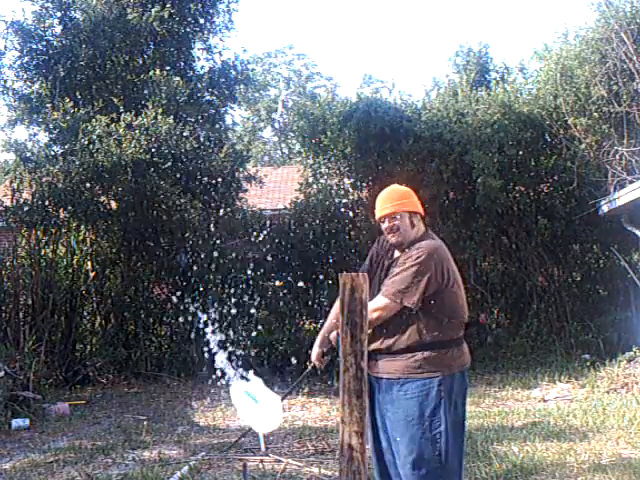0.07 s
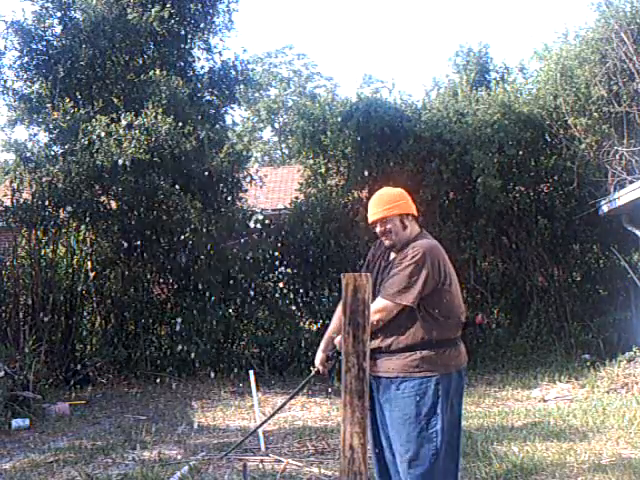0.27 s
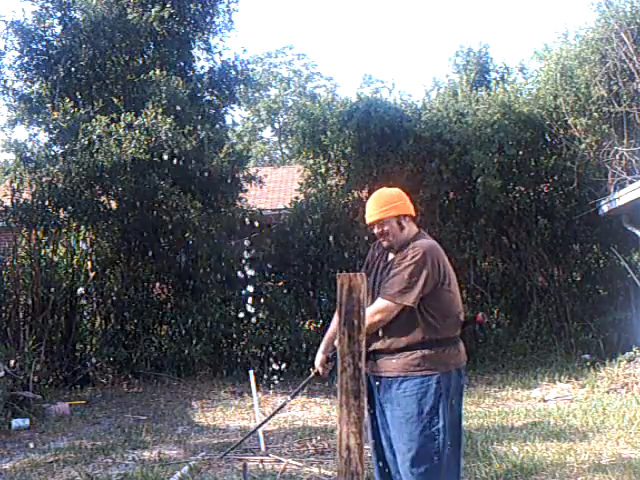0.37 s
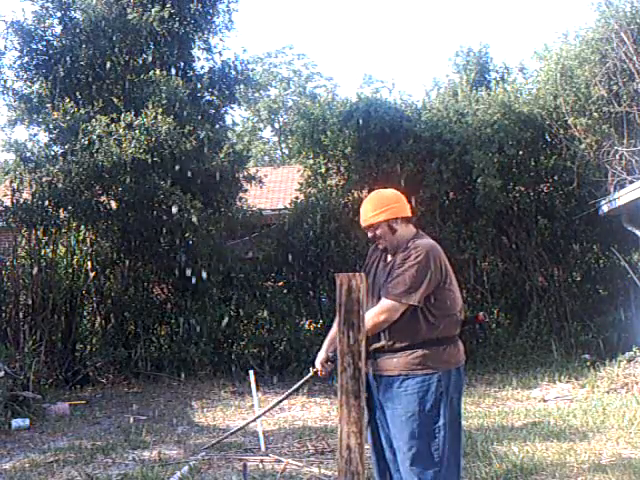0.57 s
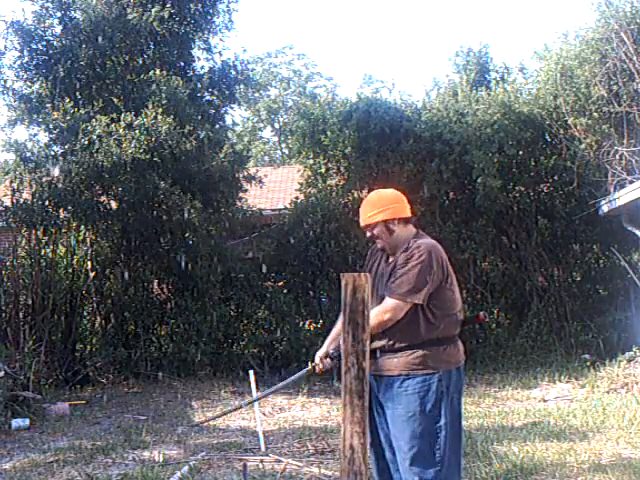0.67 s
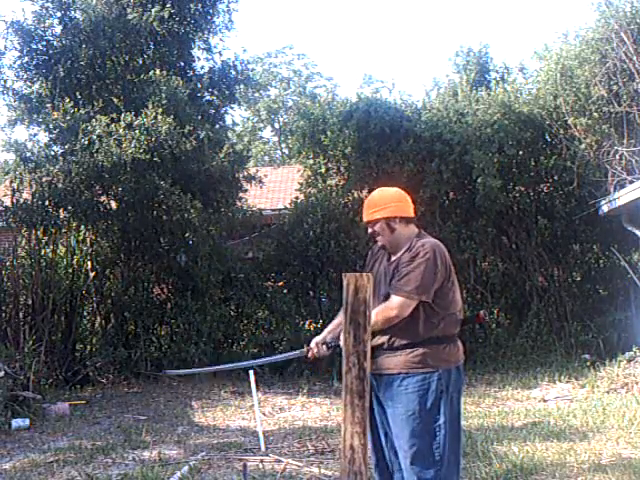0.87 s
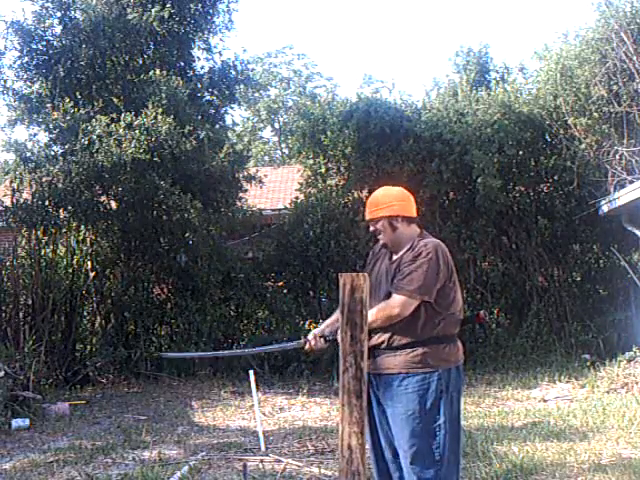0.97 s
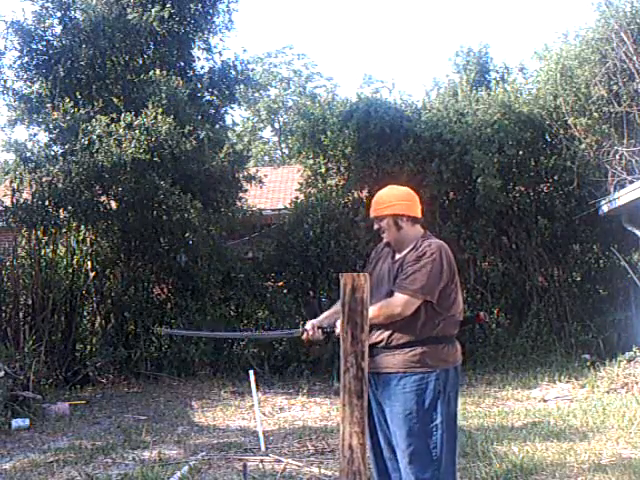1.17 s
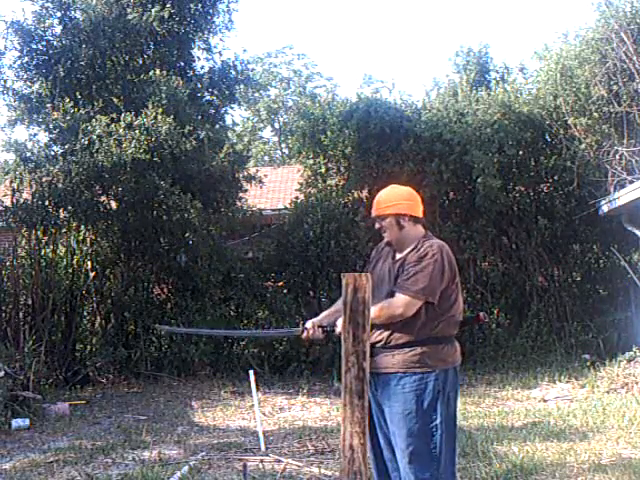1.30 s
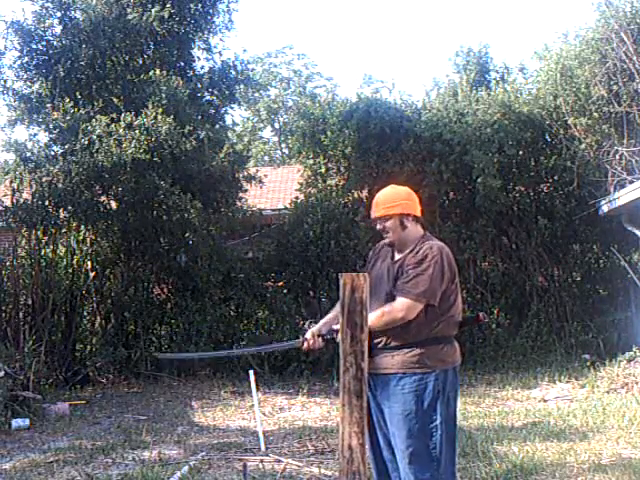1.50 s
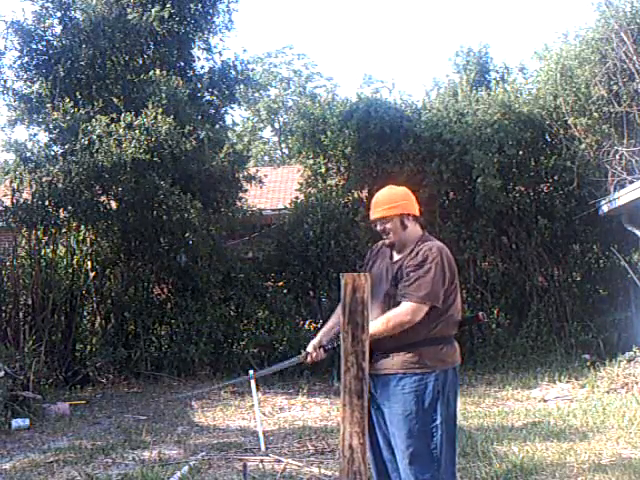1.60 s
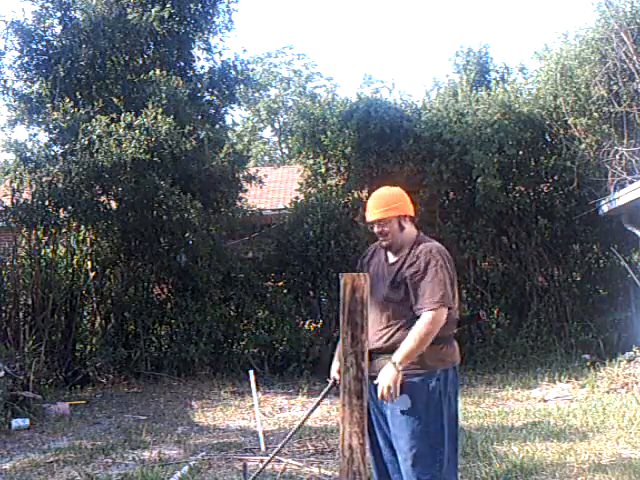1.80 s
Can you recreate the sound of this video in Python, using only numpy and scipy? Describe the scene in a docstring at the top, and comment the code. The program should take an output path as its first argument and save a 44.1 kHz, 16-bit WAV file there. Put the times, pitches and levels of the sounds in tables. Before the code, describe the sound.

A blade rips through a plastic jug of water in a backyard, followed by a loud crunching landing, splattering water and a hollow bounce. Birds chirp faintly far off, and the slightly overloaded microphone has little treble.

```python
"""A back yard, with small birds chirping far off. A sword rips through a water-filled plastic jug and
sets its wall ringing; fence and trees reflect the crack. The jug hits the ground, buckles and bounces,
each impact exciting damped modes, while water patters down and trapped air pockets resonate.
A narrow-band microphone saturates on the two big blows."""
import sys
import numpy as np
from scipy import signal
from scipy.fft import rfft, irfft, next_fast_len
from scipy.io import wavfile

SR = 44100
rng = np.random.default_rng(int(sys.argv[2]) if len(sys.argv) > 2 else 0)


def master(y):
    """Save y as 16-bit WAV."""
    cut = np.clip(np.atleast_2d(y).T, -1, 1)
    pcm = np.round(cut * 32767)  # scale
    wavfile.write(sys.argv[1], SR, pcm.astype(np.int16))


N = 81585
T = np.arange(N) / SR
BAND_HZ = 5405  # upper end of the microphone's band


def undb(db):
    """Level in decibels to amplitude ratio."""
    return 10 ** (np.asarray(db) / 20)


def unit(x):
    """Normalisation to rms 1."""
    return x / np.sqrt(np.mean(x ** 2))


def colour(x, points):
    """Minimum-phase filter through (Hz, dB) points, of unit mean power gain below BAND_HZ."""
    hz, db = np.array(points, float).T
    size = 2 * next_fast_len(N)
    f = np.arange(size // 2 + 1) * SR / size
    gain = undb(np.interp(np.log(f + 1), np.log(hz), db))
    gain /= np.sqrt(np.mean(gain[f < BAND_HZ] ** 2))
    cepstrum = irfft(np.log(gain))
    cepstrum[1:size // 2] *= 2  # folding the cepstrum makes the filter causal
    cepstrum[size // 2 + 1:] = 0
    return irfft(rfft(x, size) * np.exp(rfft(cepstrum)))[:N]


def band(x, lo_hz, hi_hz):
    """Band-pass filtering, normalised to rms 1."""
    return unit(signal.sosfilt(signal.butter(3, [lo_hz, hi_hz], "band", fs=SR, output="sos"), x))


def grit(centre_hz=None, octaves=1):
    """Envelope compression turns band-limited noise, flat or humped, into a dense, even crackle."""
    f = np.arange(N // 2 + 1) * SR / N + 1
    hump = 1
    if centre_hz is not None:
        hump = np.exp(-.5 * (np.log2(f / centre_hz) / octaves) ** 2) * (centre_hz / f) ** .25
    noise = irfft(rfft(rng.standard_normal(N)) * hump * (f < BAND_HZ * 1.1), N)
    analytic = signal.hilbert(noise, next_fast_len(N))[:N]
    return unit(analytic.real / np.sqrt(np.abs(analytic)))


def burst(start, fall, hold=0, attack=0.00051):
    """Envelope with a linear attack and, after the hold, exponential decay of time constant fall."""
    age = T - start
    return np.clip(age / attack, 0, 1) * np.exp(-np.maximum(age - hold, 0) / fall)


def ring(start, modes, pitch=1, length=1):
    """Modal superposition: a struck body vibrates as a sum of damped sinusoids."""
    age = np.maximum(T - start, 0)
    return sum((-1) ** k * undb(db - 60 * age / (t60 * length)) * np.sin(2 * np.pi * hz * pitch * age)
               for k, (hz, db, t60) in enumerate(modes))


def pulse(start, hz, damping):
    """Transient of a heavily damped oscillator, differentiated and scaled to peak 1."""
    phase = 2 * np.pi * hz * np.maximum(T - start, 0)
    swing = np.exp(-damping * phase) * np.sin(phase) * (1 - np.exp(-2 * phase))
    pressure = np.diff(swing, prepend=0)
    return pressure / np.abs(pressure).max()


def note(start, length, hz):
    """A gliding tone that swells and dies; its phase is the integral of its frequency."""
    progress = np.clip((T - start) / length, 0, 1)
    phase = 2 * np.pi * np.cumsum(hz * (progress > 0)) / SR
    return np.sqrt(2 * np.abs(np.sin(np.pi * progress))) * np.sin(phase)


def scatter(x, envelope):
    """Diffuse reflection from many small surfaces: convolution with enveloped noise of unit energy."""
    response = rng.standard_normal(N) * envelope
    return signal.fftconvolve(x, response / np.sqrt(np.sum(response ** 2)))[:N]


# spectrum of the outdoor air (frequency [Hz], relative level [dB])
AIR_SPECTRUM = [(25, -9), (55, 0), (120, -1), (160, -2), (250, -2.5), (400, -7.5), (560, -4.5), (800, -5),
                (2500, -7), (4900, -10), (5500, -13.5), (6500, -21)]
# bands of a low hum (centre frequency [Hz], level [dB])
HUM_BANDS = [(58, -60), (118, -59)]
def background():
    """Ambient noise: broadband air, and a hum that wavers as narrow-band noise does."""
    hum = sum(undb(db) * band(rng.standard_normal(N), hz - 4, hz + 4) for hz, db in HUM_BANDS)
    air = colour(band(rng.standard_normal(N), 8.1, 11000), AIR_SPECTRUM)
    return undb(-47) * unit(air) + hum


# bird chirps (time [s], duration [s], turning point [fraction of duration],
# start frequency [Hz], turning frequency [Hz], end frequency [Hz], level [dB])
BIRD_CHIRPS = [(.008, .026, .3, 3450, 3350, 3650, -44), (.036, .022, .4, 3080, 3080, 3280, -47),
               (.536, .033, .3, 3170, 3180, 3620, -41.5), (.582, .027, .7, 2500, 2920, 3300, -42),
               (.616, .023, .28, 3400, 2520, 3100, -44), (.646, .028, .3, 2600, 2330, 3300, -50),
               (.735, .04, .4, 2750, 2280, 1900, -49), (1.63, .04, .5, 2850, 2830, 2780, -52)]
def birds():
    """Frequency modulation: each short whistle glides through three pitches."""
    song = 0
    for start, length, turn, first_hz, turn_hz, last_hz, db in BIRD_CHIRPS:
        hz = np.interp((T - start) / length, [0, turn, 1], [first_hz, turn_hz, last_hz])
        song = song + undb(db) * note(start, length, hz)
    return song


CUT_S = .1998
# spectrum of the dragging blade (frequency [Hz], relative level [dB])
DRAG_SPECTRUM = [(30, -8.5), (100, -15), (250, -14), (536, -1.5), (844, -1), (1150, 1.5), (1440, 2),
                 (1740, -11), (2000, -7), (2960, -7), (4120, -11.5), (5300, -11), (6500, -15.5)]
# jerks in which the wall gives way (time [s], level [dB])
WALL_RIPS = [(.1999, -1), (.2072, 3), (.2101, -1), (.2144, -8), (.2166, 1), (.2212, -11)]
def blade():
    """Friction and fracture: the blade drags through the wall, which tears in quick jerks."""
    drag = unit(colour(grit(), DRAG_SPECTRUM)) * burst(CUT_S, fall=.009, hold=.0135)
    jerks = sum(undb(db) * burst(start, fall=.0011) for start, db in WALL_RIPS)
    return undb(-6.5) * drag + grit(centre_hz=3950, octaves=1.22) * jerks


# modes of the full jug (frequency [Hz], relative level [dB])
FULL_JUG_MODES = [(430, -13), (848, 0), (1021, -5), (1115, 2), (1273, 1), (1410, -4), (1982, -8),
                  (2384, -11), (2588, -9), (2863, -4), (3028, -6), (3403, -8), (3825, -7), (4169, -6),
                  (4505, -10), (4977, -9), (5160, -10)]
def jug_wall():
    """Forced vibration: the full jug rings while the blade drags, then dies away."""
    modes = sum(undb(db) * np.sin(2 * np.pi * (hz * T + rng.random())) for hz, db in FULL_JUG_MODES)
    return undb(-8.5) * modes * burst(CUT_S, fall=.0086, hold=.0096, attack=.0018)


# spectrum of water spraying from the cut (frequency [Hz], relative level [dB])
SPRAY_SPECTRUM = [(60, -17.5), (118, 6), (170, -13), (300, -10), (480, -2), (700, 3), (1120, 10), (1500, 3),
                  (3000, 5), (5300, -1.5)]
def gush(t60_s=1):
    """Displacement: the blow pushes a puff of air and a dying spray out of the opened jug."""
    puff = pulse(CUT_S, hz=115, damping=.84)
    outflow = burst(CUT_S + .01, fall=t60_s / np.log(1000), hold=.011, attack=.033)
    spray = unit(colour(grit(), SPRAY_SPECTRUM)) * outflow
    return undb(-12) * puff + undb(-29.5) * spray


YARD_T60_S = .56
YARD_TAIL = burst(.005, fall=YARD_T60_S / np.log(1000), attack=.0084)
# frequency response of the yard's reverberation (frequency [Hz], relative gain [dB])
YARD_RESPONSE = [(80, -8.5), (300, -12), (700, -2), (1120, -6), (1450, 1.5), (1900, -3.5), (3000, -1.5),
                 (5000, 4)]
def reverberation(x):
    """Multiple scattering in the yard leaves an exponentially decaying tail."""
    return undb(-23.5) * colour(scatter(x, YARD_TAIL), YARD_RESPONSE)


# reflections from fence and trees (delay [s], gain [dB], decay time constant [s])
REFLECTIONS = [(.05, -22, .025), (0.107, -26.5, .004), (0.187, -29, 0.0063), (0.213, -32, 0.0083),
               (.255, -31, .006)]
# frequency response of those reflections (frequency [Hz], relative gain [dB])
REFLECTION_RESPONSE = [(100, -6), (600, -6), (950, -1.5), (1140, 7), (1400, -4), (1650, -10.5), (1850, 5),
                       (2300, 2.5), (3000, 1), (5000, -1)]
def echoes(x):
    """Reflection: fence and trees return separate echoes, each delayed and smeared in time."""
    returns = sum(undb(db) * scatter(x, burst(delay, fall)) for delay, db, fall in REFLECTIONS)
    return colour(returns, REFLECTION_RESPONSE)


# slaps and crackles of the plastic
# (time [s], level [dB], centre frequency [Hz], width [octaves], decay time constant [s])
PLASTIC_CRACKS = [(.86, -17, 900, 2, .01), (.863, -16, 1520, 1.7, 0.031), (0.877, -15.5, 703, 1.6, 0.0062),
                  (0.8863, 0, 4000, 2.4, 0.0017), (0.887, -6.5, 1590, 3.7, .011),
                  (.904, -11.5, 1190, 1.7, 0.0066), (.923, -15, 1480, 1.3, 0.0039),
                  (.928, -14, 1265, 0.38, 0.0031), (.94, -20, 880, 1.2, 0.0051),
                  (0.947, -24.5, 1886, 1.3, 0.0096), (0.959, -22.5, 2390, 3, 0.011),
                  (.968, -25, 2210, 1.2, 0.0075), (1.02, -31.5, 500, 1.2, 0.02),
                  (1.216, -27, 1700, 3.2, 0.005), (1.2462, -13.5, 4510, 1.35, 0.0043),
                  (1.261, -29, 4200, 0.75, .0062), (1.2667, -13.5, 2380, 2, 0.0047),
                  (1.2814, -20.5, 3020, 1.3, 0.0027), (1.2877, -22.5, 1600, 0.86, 0.0022),
                  (1.405, -29.5, 1014, 1.3, 0.02), (1.441, -25.5, 1550, 1.3, 0.016),
                  (1.4802, -29.5, 3500, 0.67, 0.0046), (1.553, -35, 990, 0.87, 0.037),
                  (1.596, -24, 1210, 6.5, 0.0031), (1.597, -36.5, 243, 0.26, 0.015)]
def cracks():
    """Impact noise: slapping, crackling plastic gives off brief bands of noise."""
    return sum(undb(db) * grit(hz, octaves) * burst(start, fall)
               for start, db, hz, octaves, fall in PLASTIC_CRACKS)


# snaps of the plastic (time [s], peak level [dB], frequency [Hz], damping ratio [1])
BUCKLING_SNAPS = [(.8665, -1, 1500, .12), (.8862, 5, 2000, .25), (.895, -14, 130, .4), (.958, -9, 1800, .2),
                  (1.0212, -13, 3800, .2), (1.1075, -16, 1800, .1), (1.168, -22, 4600, .15),
                  (1.2083, -14, 2600, .3), (1.2203, -17, 900, .4), (1.2335, -5, 1700, .2),
                  (1.2492, -10, 4900, .07), (1.2595, -11, 4300, .1), (1.2686, -6.5, 1300, .25),
                  (1.2685, -15, 190, 1), (1.2885, -18, 1700, .15), (1.3652, -16.5, 3900, .12),
                  (1.4055, -20, 1300, .15), (1.4405, -11, 1300, .2), (1.4402, -17, 450, .2),
                  (1.5945, -18, 1000, .2)]
def snaps():
    """Buckling: the wall jumps to a new shape and radiates one sharp transient each time."""
    return sum(undb(db) * pulse(start, hz, damping) for start, db, hz, damping in BUCKLING_SNAPS)


# modes of the cut jug (frequency [Hz], relative level [dB], 60 dB decay time [s])
CUT_JUG_MODES = [(185, -15, .11), (262, -20, .1), (381, -20, .09), (490, -3.5, .105), (685, -.5, .095),
                 (830, -10, .1), (968, -11, .1), (1223, -11, .09), (1425, -12, .1), (1553, -12, .08),
                 (1850, -16, .09), (2102, -16, .08)]
# impacts on the ground (time [s], level [dB], frequency factor [1], decay time factor [1])
GROUND_IMPACTS = [(.8865, -11, 1.2, .6), (.8925, -2, 1, .62), (1.594, -38, 1, 1)]
def thumps():
    """Impulse excitation: each impact on the ground sets the cut jug's modes ringing."""
    return sum(undb(db) * ring(start, CUT_JUG_MODES, pitch, length)
               for start, db, pitch, length in GROUND_IMPACTS)


def drops(per_s=1800, spread_db=3):
    """A Poisson process of drop impacts, mostly small and a few large."""
    sizes = undb(spread_db * np.minimum(rng.exponential(size=N), 4))
    return (rng.random(N) < per_s / SR) * sizes * rng.choice([-1, 1], N)


# water running out onto the ground (time [s], slosh level [dB], splatter level [dB], spray level [dB])
WATER_LEVELS = [(.93, -37, -36.5, -29.5), (.975, -53, -40.5, -32.5), (1.05, -41.5, -39.5, -40),
                (1.115, -51.5, -37, -37), (1.159, -42.5, -47, -43), (1.205, -50.5, -38.5, -45.5),
                (1.266, -65, -32.5, -31.5), (1.34, -37.5, -39.5, -40.5), (1.39, -48.5, -38.5, -41.5),
                (1.472, -39.5, -42.5, -48), (1.496, -42, -34.5, -31.5), (1.539, -53, -38, -42.5),
                (1.611, -46.5, -41, -43), (1.64, -51, -65, -54), (1.85, -87, -66, -90)]
def water():
    """Shot noise: showers of drops merge into low slosh, middle splatter and high spray."""
    times, slosh_db, splatter_db, spray_db = np.array(WATER_LEVELS).T
    shower = drops()
    slosh = band(drops(), 260, 628) * undb(np.interp(T, times, slosh_db))
    splatter = band(shower, 520, 1870) * undb(np.interp(T, times, splatter_db))
    spray = band(shower + drops(), 2200, 5280) * undb(np.interp(T, times, spray_db))
    onset = np.clip((T - .89) / .017, 0, 1)
    return onset * (slosh + splatter + spray)


# air pockets gulping as the water shifts (time [s], duration [s], start frequency [Hz], level [dB])
AIR_POCKETS = [(.902, 0.013, 857, -11.5), (1.512, 0.015, 700, -37.5), (1.558, 0.019, 795, -34.5),
               (1.62, 0.053, 379, -49.5)]
def gulps(rise=.053):
    """Bubble resonance: trapped air rings briefly, rising in pitch as the pocket shrinks."""
    return sum(undb(db) * note(start, length, hz * (1 + rise * (T - start) / length))
               for start, length, hz, db in AIR_POCKETS)


# modes of the emptied jug (frequency [Hz], relative level [dB], 60 dB decay time [s])
EMPTY_JUG_MODES = [(375, -4, .055), (458, -2, .24), (587, -4, .07), (680, -2, .05), (1050, -3, .05),
                   (1200, -3, .05), (1380, -4, .045), (1990, -5, .045)]
# bounces of the emptied jug (time [s], level [dB], frequency factor [1])
BOUNCES = [(1.405, -39, 1.08), (1.4397, -20.5, 1.017), (1.617, -57, .87)]
def knocks():
    """Free vibration: the emptied jug rings hollow after each bounce."""
    return sum(undb(db) * ring(start, EMPTY_JUG_MODES, pitch) for start, db, pitch in BOUNCES)


def radiate(x, cutoff_hz=167):
    """Radiation efficiency: thin plastic gives off little sound below the cutoff."""
    return signal.sosfilt(signal.butter(2, cutoff_hz, "high", fs=SR, output="sos"), x)


def scene():
    """Superposition of direct and reflected sound; only the cut returns as separate echoes."""
    tear, wall, song = blade(), jug_wall(), birds()
    tumble = radiate(cracks() + thumps() + knocks()) + snaps() + gulps()
    outgoing_cut = tear + undb(-6) * wall
    reflected = reverberation(outgoing_cut + undb(2) * tumble) + echoes(outgoing_cut)
    distant = song + undb(-9) * scatter(song, YARD_TAIL) + background()
    return (distant + tear + wall + gush() + reflected + tumble + water())[None]


def record(dry, saturation=.81, ceiling=.69):
    """Nonlinear distortion: the microphone saturates, its band cuts the treble, and the peaks clip."""
    roll_off = signal.butter(11, BAND_HZ * 1.04, fs=SR, output="sos")
    band_edge = signal.ellip(8, .05, 50, 6150, fs=SR, output="sos")
    harmonic_limit = signal.ellip(8, .2, 70, 16000, fs=SR, output="sos")
    saturated = saturation * np.tanh(dry / saturation)
    narrow = signal.sosfiltfilt(band_edge, signal.sosfiltfilt(roll_off, saturated))
    return signal.sosfilt(harmonic_limit, np.clip(narrow, -ceiling, ceiling))


dry = scene()
out = record(dry)
master(out)
```